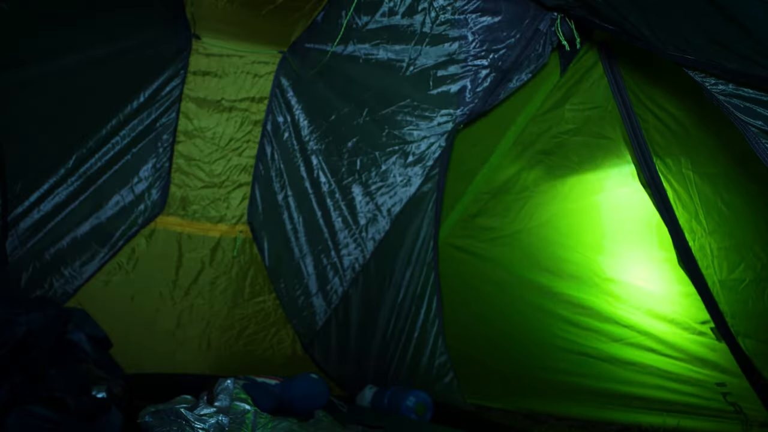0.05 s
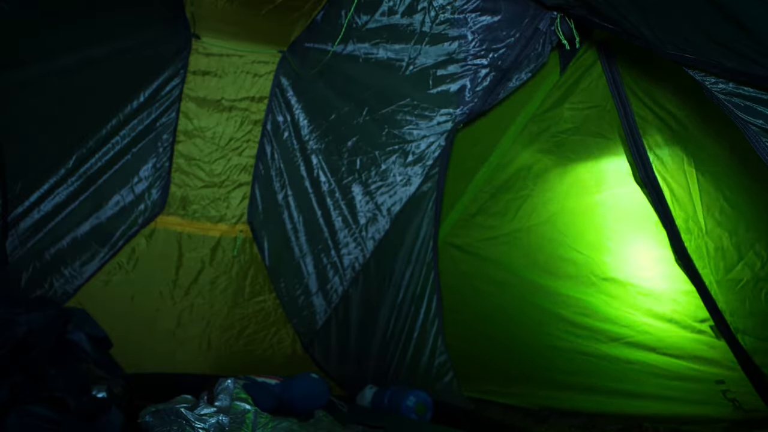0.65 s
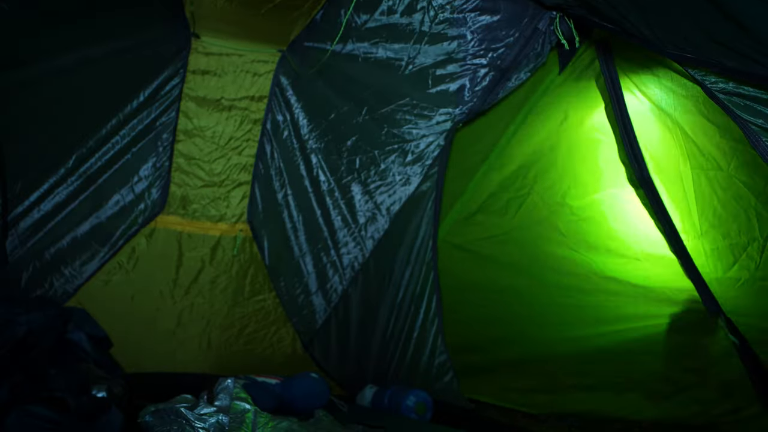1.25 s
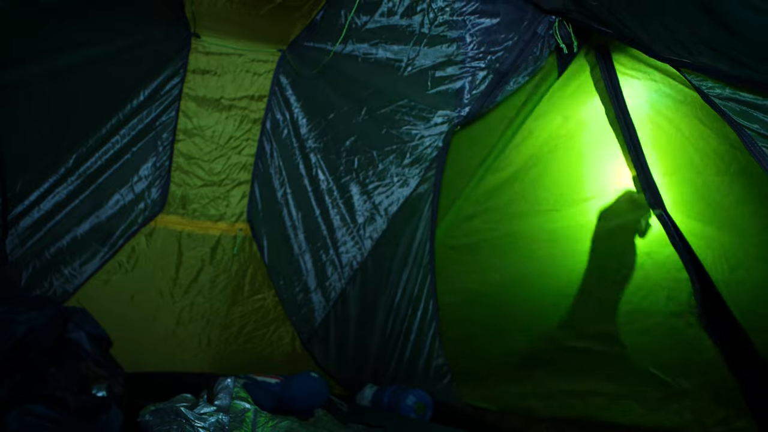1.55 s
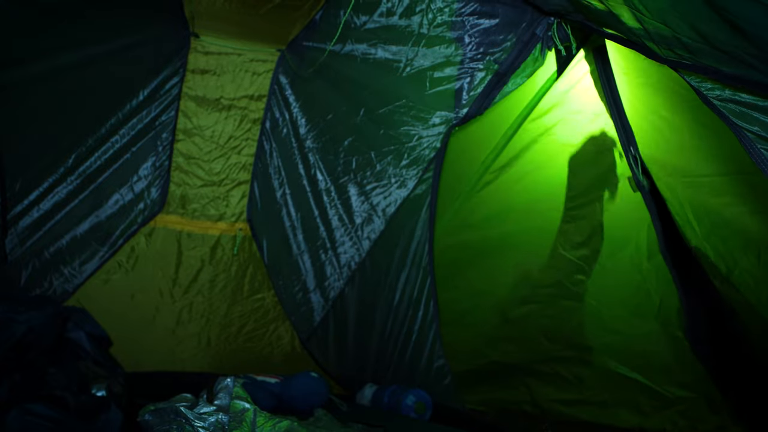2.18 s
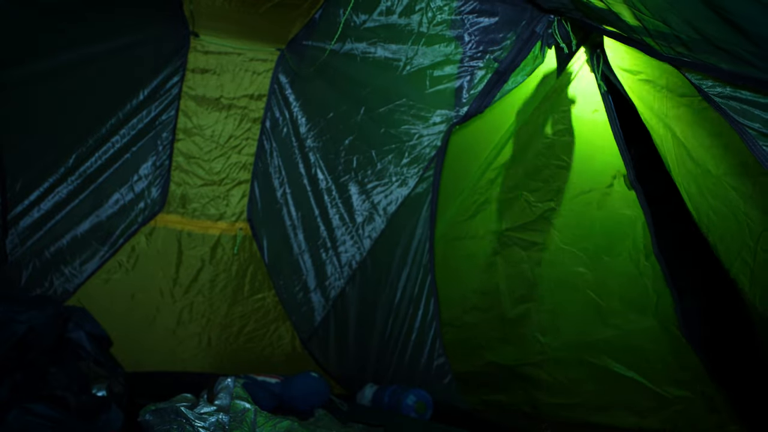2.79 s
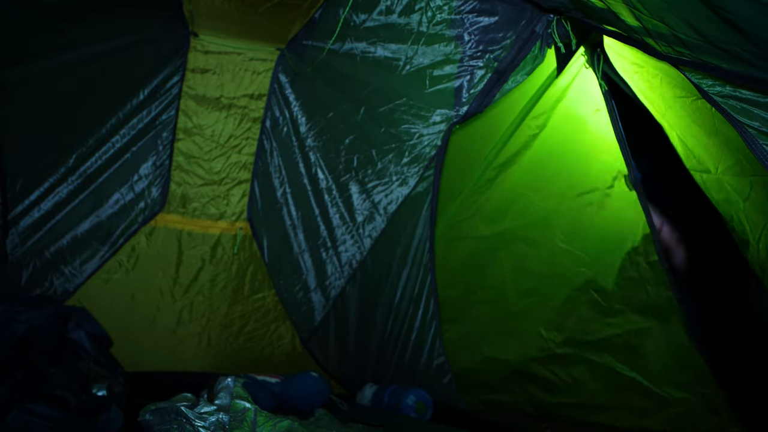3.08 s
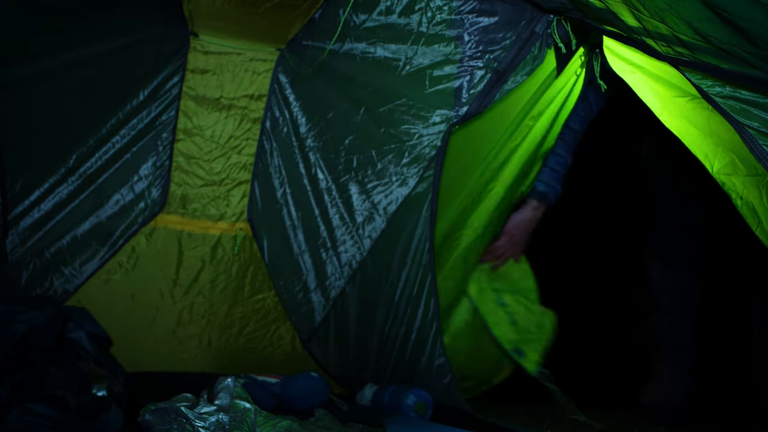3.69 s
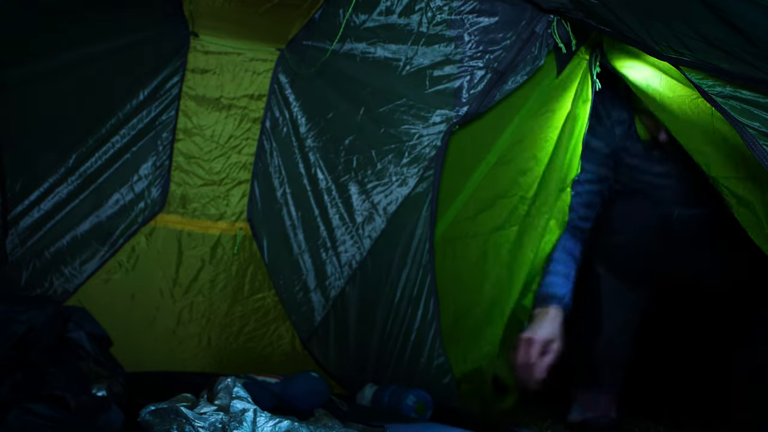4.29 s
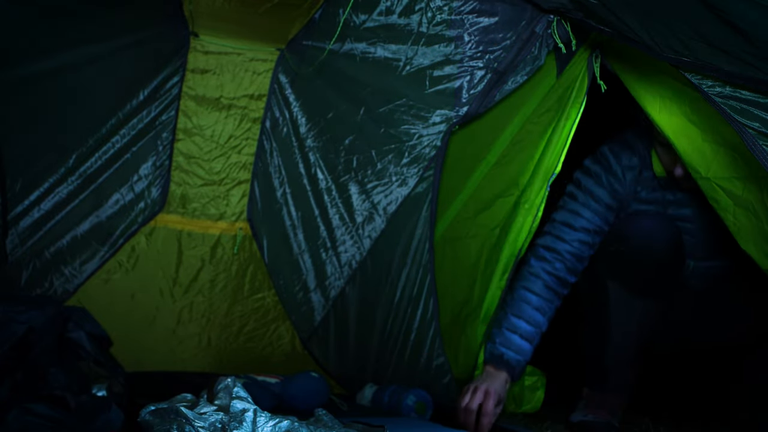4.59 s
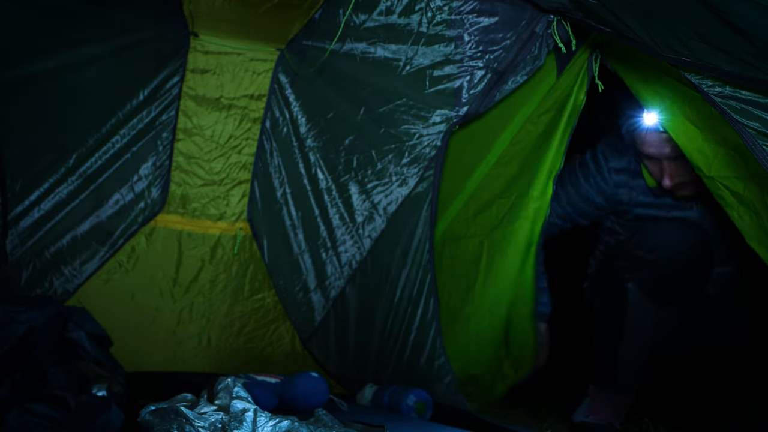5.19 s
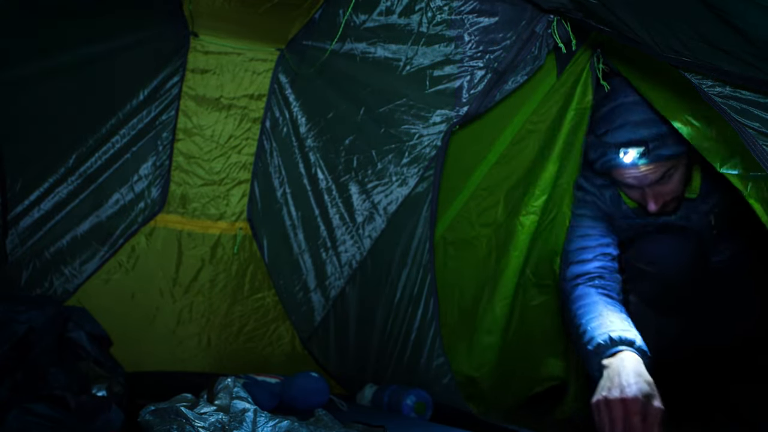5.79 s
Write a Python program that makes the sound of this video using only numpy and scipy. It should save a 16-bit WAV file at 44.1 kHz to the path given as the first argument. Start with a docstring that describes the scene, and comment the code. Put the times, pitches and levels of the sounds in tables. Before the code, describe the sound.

Faint nylon rustling over the low hush of a still night, heard from inside a small tent with the door slightly to the right. At about 0.7 seconds two soft thuds tug the door, and the zipper starts: a rasp with a hum from the taut fabric, growing faster and louder before ending in a sharp fabric snap around 1.6 seconds. After a brief rustle and tiny squeak, a shorter, brighter pull runs from 2.1 to 2.7 seconds, with several crisp snaps. The walls billow in soft, low puffs. From about 2.7 seconds the flap is pushed aside, and nylon swishes and crinkles in uneven strokes with small snapping folds. A person in a padded jacket crawls in, the rustling turning brighter and hissier from around 5 seconds, with one more soft thud and faint fabric squeaks, continuing until about 6 seconds.

```python
"""Faint nylon rustling on a still night, then a small tent's door unzips in two pulls; someone in a
padded jacket pushes the flap aside and crawls in. The zip's teeth drive the taut door like a drumskin,
louder as the slider speeds up. Arm strokes make the cloth swish and crinkle, folds snap, the weave
squeaks and the walls billow. Heard in stereo from inside the tent, a little left of the door."""
import sys
import numpy as np
from scipy import signal
from scipy.fft import rfft, irfft
from scipy.io import wavfile
from scipy.ndimage import uniform_filter1d, map_coordinates

SR = 44100
rng = np.random.default_rng(int(sys.argv[2]) if len(sys.argv) > 2 else 0)


def digitize_waveform(pressure):
    """Quantize a signal to 16-bit integers and store it at the path in sys.argv[1].

    Rows of a 2-D input are taken as channels; values are limited to [-1, 1].
    """
    field = np.atleast_2d(pressure).T
    bounded = np.clip(field, -1, 1)
    quanta = np.round(bounded * 32767).astype(np.int16)
    wavfile.write(sys.argv[1], SR, quanta)


N = 257984
TIME = np.arange(N) / SR
BIN_HZ = np.arange(N // 2 + 1) * SR / N


def undb(db):
    """Decibels to gain."""
    return np.exp(np.asarray(db) * (np.log(10) / 20))


def unit(x):
    """Scale to rms 1."""
    return x / np.sqrt(np.mean(x ** 2) + 1e-18)


def gains(points):
    """Gain per FFT bin from (f/Hz, level/dB) points joined on a log axis."""
    hz, db = np.transpose(points)
    return undb(np.interp(np.log(np.maximum(BIN_HZ, 1)), np.log(hz), db))


def colour(x, points):
    """Filter by a (f/Hz, level/dB) spectrum."""
    return irfft(rfft(x) * gains(points), N)


def band(x, low_hz, high_hz, order=4):
    """Butterworth band-pass."""
    return signal.sosfilt(signal.butter(order, [low_hz, high_hz], "band", fs=SR, output="sos"), x)


def above(x, hz):
    """Zero-phase high-pass."""
    return signal.sosfiltfilt(signal.butter(2, hz, "high", fs=SR, output="sos"), x)


def curves(rows):
    """Columns after t/s, interpolated per sample."""
    times_s, *columns = np.transpose(rows)
    return [np.interp(TIME, times_s, column) for column in columns]


def walk(rate_hz):
    """Random curve of rms 1, about rate_hz new values a second."""
    step = max(int(SR / rate_hz), 1)
    return unit(uniform_filter1d(np.repeat(rng.standard_normal(N // step + 1), step), step)[:N])


def crackle(rate_hz, spread_db, grain_s):
    """Tiny creases give way: many faint bursts, a few strong ones. Mid and side."""
    size = undb(spread_db * np.minimum(rng.standard_exponential(N), 4))
    bursts = (rng.random(N) < rate_hz / SR) * size ** 2
    energy = signal.lfilter([1], [1, -np.exp(-2 / (grain_s * SR))], bursts + 1e-18)
    return unit(np.sqrt(energy) * rng.standard_normal((2, N)))


def movement(peak_s, length_s, slacken_db=5.5, release_s=0.035):
    """A movement builds up (a long one more slowly), slackens while it lasts and dies away."""
    attack_s = 0.034 + 0.61 * length_s
    span = slice(*np.searchsorted(TIME, [peak_s - attack_s, peak_s + length_s + 10 * release_s]))
    t = TIME[span] - peak_s
    attack = np.clip(t / attack_s + 1, 0, 1) ** 2
    hold = undb(-slacken_db * np.clip(t / length_s, 0, 1))
    strength = np.zeros(N)
    strength[span] = attack * hold * np.exp(-np.maximum(t - length_s, 0) / release_s)
    return strength


# Night air spectrum: f/Hz, level/dB
AIR_SPECTRUM = [(15, -28), (25, 1), (1280, -17), (1760, -18.5), (6370, -33.5), (15000, -59.5)]
def night_air(level_db=-53):
    """Still air: a steady, dark hush."""
    return undb(level_db) * unit(colour(rng.standard_normal((2, N)), AIR_SPECTRUM))


# Billowing wall spectrum: f/Hz, level/dB
WALL_SPECTRUM = [(15, -24), (30, -7.5), (50, -2.5), (100, -0.5), (170, -2.5), (300, -12.5), (600, -23),
                 (2000, -70)]
# Heavier pushes: peak t/s, length/s, level/dB
WALL_PUSHES = [(0.777, 0.076, -37), (1.046, 0.35, -35.5), (1.355, 0.54, -33.5), (2.172, 0.054, -32.5),
               (2.28, 0.27, -42), (2.614, 0.061, -35), (4.106, 0.12, -41.5), (5.237, 0.051, -37)]
def billow(rub_power, sway_db=-57.5, follow_db=-15, gain_db=0.74):
    """Slack panels flop in soft, low puffs with every push and stroke."""
    power = undb(sway_db) ** 2 + undb(follow_db) ** 2 * rub_power
    power += sum((undb(db) * movement(peak_s, length_s)) ** 2 for peak_s, length_s, db in WALL_PUSHES)
    puffs = colour(crackle(rate_hz=450, spread_db=2.4, grain_s=0.006), WALL_SPECTRUM)
    return unit(puffs) * np.sqrt(power) * undb(gain_db)


# Tugs on the door: t/s, level/dB
DOOR_TUGS = [(0.704, -19), (0.734, -16), (5.42, -18.5)]
def door_thuds(hz=115, decay_s=0.0014):
    """The hand takes up the door's slack: one short thud per tug."""
    out = np.zeros(N)
    for start_s, db in DOOR_TUGS:
        t = np.maximum(TIME - start_s, 0)
        out += undb(db) * np.sin(2 * np.pi * hz * t) * np.exp(-t / decay_s)
    return out


# Ribbed weave sliding: t/s, length/s, first f/Hz, last f/Hz, level/dB
WEAVE_SQUEAKS = [(1.936, 0.031, 4500, 4230, -50), (1.982, 0.033, 1926, 1670, -37.5),
                 (2.702, 0.252, 1605, 1569, -48), (5.502, 0.022, 3860, 3810, -35.5),
                 (5.605, 0.047, 3340, 3260, -34.5)]
def squeaks(jitter=0.025):
    """Threads trip over each other and sing at a rough, slightly falling pitch."""
    out = np.zeros((2, N))
    for start_s, length_s, first_hz, last_hz, db in WEAVE_SQUEAKS:
        progress = np.clip((TIME - start_s) / length_s, 0, 1)
        for channel in out:
            hz = (first_hz + (last_hz - first_hz) * progress) * (1 + jitter * walk(1000))
            envelope = np.sin(np.pi * progress) * undb(db + 2 * walk(160))
            channel += envelope * np.sin(2 * np.pi * np.cumsum(hz) / SR)
    return out


# Nylon-on-nylon strokes: peak t/s, length/s, level/dB, brightness/dB
ARM_STROKES = [(0.0, 0.077, -49.5, -4.5), (0.193, 0.056, -48, -3), (1.199, 0.014, -33.5, -2.5),
               (1.683, 0.22, -47, -1.5), (1.967, 0.13, -45.5, -0.5), (2.171, 0.016, -25, -2.5),
               (2.575, 0.062, -36.5, 0.5), (2.797, 0.083, -44.5, -5.5), (2.875, 0.013, -43, 2),
               (3.086, 0.45, -51, -7.5), (3.235, 0.096, -37, -2.5), (3.407, 0.16, -40.5, -2),
               (3.517, 0.072, -36.5, 2), (3.632, 0.058, -38.5, -2), (3.714, 0.063, -36, 2.5),
               (3.82, 0.22, -41.5, -1), (4.119, 0.15, -40, -2.5), (4.262, 0.45, -39.5, 3),
               (4.765, 0.19, -41.5, 1.5), (5.014, 0.5, -47.5, -0.5), (5.161, 0.12, -47.5, 28),
               (5.214, 0.069, -31, 4.5), (5.445, 0.038, -41, -2.5), (5.504, 0.015, -39, 10),
               (5.62, 0.055, -35, 6), (5.662, 0.32, -38.5, 7.5)]
def arm_strokes(stir_db=-68, stir_bright_db=-13, dulling_db=7):
    """Rubbing power and power-weighted brightness/dB over a faint stir; slowing strokes turn duller."""
    power = undb(stir_db) ** 2
    weighted_db = power * stir_bright_db
    for peak_s, length_s, db, bright_db in ARM_STROKES:
        strength = movement(peak_s, length_s)
        stroke_power = (undb(db) * strength) ** 2
        power += stroke_power
        weighted_db += stroke_power * (bright_db - dulling_db * (1 - strength))
    return power, weighted_db / power


# Rubbed nylon spectrum: f/Hz, level/dB
NYLON_SPECTRUM = [(88, -41), (150, -2.5), (343, -4.5), (780, -2.5), (1180, -9), (1600, -2), (2000, -5.5),
                  (2600, -7), (3400, -9.5), (4210, -13.5), (5200, -16.5), (10200, -34), (12600, -33),
                  (15000, -52)]
def sliding_nylon(crinkle_db, patchy_db):
    """Sliding cloth swishes while its creases crinkle; rms 1 in the middle band."""
    swish = rng.standard_normal((2, N)) * undb(patchy_db * walk(45))
    crinkle = crackle(rate_hz=200, spread_db=3.1, grain_s=0.0024)
    cloth = colour(swish + undb(crinkle_db) * crinkle, NYLON_SPECTRUM)
    return cloth / np.std(band(cloth[0], 500, 4000))


# Hollow colour of the rustle: t/s, first mid-channel peak f/Hz, strength/0-1
HOLLOW_TREBLE = [(2.7, 1485, 0.13), (3.6, 1764, 0.08), (5.25, 1630, 0.2), (5.65, 1750, 0.24)]
def hollow_comb(cloth, side_delay_ratio=1.53):
    """A short delay combs the treble, differently in mid and side, so the rustle sounds hollow."""
    hz, strength = curves(HOLLOW_TREBLE)
    treble = above(cloth, 1250)
    late = np.array([map_coordinates(channel, [np.arange(N) - ratio * SR / hz])
                     for channel, ratio in zip(treble, (1, side_delay_ratio))])
    return cloth - treble + (treble + strength * late) / np.hypot(1, strength)


def rustle(rub_power, bright_db, gain_db=0.04):
    """Door folds crinkle low, the jacket's shell hisses high; faster sliding tilts towards hiss."""
    folds = sliding_nylon(crinkle_db=-0.5, patchy_db=2.2)
    shell = sliding_nylon(crinkle_db=-5, patchy_db=2)
    low = (folds - above(folds, 1100)) * undb(-0.34 * bright_db)
    middle = above(folds, 1100) - above(folds, 2900)
    treble = (above(shell, 2350) - above(shell, 5000)) * undb(0.57 * bright_db)
    hiss = above(shell, 5000) * undb(bright_db - 2)
    return np.sqrt(rub_power) * undb(gain_db) * hollow_comb(low + middle + treble + hiss)


# Taut cloth modes: f/Hz, level/dB, t60/s
TAUT_MODES = [(125, -18, 0.09), (294, 9.5, 0.0073), (705, 3.5, 0.019), (1068, 3.5, 0.013),
              (1835, 8.5, 0.01), (2363, -1.5, 0.02), (3540, -5, 0.014)]
# Slider catches and snapping folds: t/s, level/dB, centre f/Hz
FOLD_SNAPS = [(0.371, -37, 590), (0.751, -31, 760), (0.947, -27, 600), (1.044, -23.5, 590),
              (1.434, -23, 400), (1.643, -7.5, 660), (1.761, -29, 689), (1.817, -24, 626),
              (1.867, -28, 600), (2.156, -13.5, 1890), (2.166, -15, 593), (2.175, -13, 1710),
              (2.191, -16, 2140), (2.498, -10.5, 1770), (2.697, -28.5, 1160), (2.863, -28, 1530),
              (3.276, -17.5, 1870), (3.361, -22.5, 1830), (3.389, -29.5, 1390), (3.411, -25.5, 1580),
              (3.438, -26.5, 1740), (3.461, -31, 1580), (3.769, -26, 1500), (4.017, -25, 1940),
              (4.74, -22, 2100), (4.745, -19, 2100), (4.771, -27, 2800), (5.205, -21, 1450)]
def snaps(full_ring_db=-13, crack_s=0.001, crumple_s=0.012, rise_s=0.00061, gain_db=1, side_db=-3):
    """A fold cracks, rings and crumples. Tight folds favour high modes; light snaps barely ring."""
    out, t = np.zeros((2, N)), TIME[:SR // 16]
    hz, mode_db, t60_s = np.transpose(TAUT_MODES)[:, :, None]
    for start_s, db, centre_hz in FOLD_SNAPS:
        detune = 1 + 0.07 * rng.standard_normal((2, len(hz), 1))
        favour_db = np.maximum(-6 * np.log2(hz / centre_hz) ** 2, -6)
        weight = undb(mode_db + favour_db) * rng.choice([-1, 1], detune.shape)
        ring = np.sum(weight * np.sin(2 * np.pi * hz * detune * t) * undb(-60 * t / t60_s), axis=1)
        ring_db = -0.65 * np.clip(full_ring_db - db, 0, 15)
        noise = band(rng.standard_normal((2, len(t))), centre_hz / 4, 2000 + 0.7 * centre_hz, order=3)
        crack = noise * (np.exp(-t / crack_s) + undb(-12) * np.exp(-t / crumple_s))
        snap = undb(ring_db) * ring / np.abs(ring).max() + undb(-5) * crack
        snap *= 1 - np.exp(-t / rise_s)
        snap /= np.abs(snap).max(axis=1, keepdims=True)
        start = int(start_s * SR)
        out[:, start:start + len(t)] += snap * undb(db + gain_db)
    return out * undb([[0], [side_db]])


# Door resonances: f/Hz, half-width/Hz, boost/dB
DOOR_MODES = [(258, 137, 6.5), (461, 17.6, 9.5), (555, 12, 4), (708.6, 8.7, 9)]
def door_hum(teeth, tooth_hz, rough, slowness, halving_octaves_per_s=28):
    """Each tooth tugs the door: a hum at the tooth rate, louder on a resonance."""
    octave = 0.2 * slowness * np.cos(4 * np.pi * teeth + walk(40))  # slow teeth tug one by one
    tug_strength = 1 + (0.1 + 0.6 * rough) * walk(600)
    hum = np.sqrt(2) * (np.sin(2 * np.pi * teeth) + octave) * tug_strength
    boost_db = sum(db / (1 + ((tooth_hz - hz) / width_hz) ** 2) for hz, width_hz, db in DOOR_MODES)
    # a sudden change of speed leaves the door no time to ring
    octaves_per_s = uniform_filter1d(np.abs(np.gradient(np.log2(tooth_hz))) * SR, SR // 50)
    lurch = octaves_per_s / halving_octaves_per_s
    return hum * undb(boost_db + 1.9 * walk(70)) / (1 + lurch ** 2)


def tooth_ticks(teeth, spread_db):
    """One sharp tick per tooth, each of its own strength; overtones waver as the slider travels."""
    strength = undb(spread_db * rng.standard_normal(N)[np.round(teeth).astype(int)])
    ticks = np.zeros(N)
    for harmonic in range(2, 16):
        overtone = np.cos(2 * np.pi * (harmonic * teeth + 0.15 * walk(30)))
        ticks += strength * min(harmonic / 3.3, 1) * overtone * undb(2.6 * walk(30))
    return ticks - above(ticks, 5000)


# Spectrum of the slider on the teeth: f/Hz, level/dB
SLIDER_SPECTRUM = [(200, -30), (550, -1), (780, 6), (1080, 0), (1380, 4), (1850, 0), (2420, -4.5),
                   (2820, -5), (3150, -10.5), (3500, -10), (4600, -15.5), (5800, -17), (15000, -53)]
def through_slider(drive, progress, gate, ring_hz, ring_db):
    """The slider colours the rasp; higher up, the tauter tape rings more. Output is levelled."""
    rasp = colour(drive, SLIDER_SPECTRUM)
    ring = signal.lfilter(*signal.iirpeak(ring_hz, 3, SR), rasp)
    rasp += undb(ring_db) * progress ** 2 * ring
    power = band(np.atleast_2d(rasp)[0], 1100, 4500) ** 2
    return rasp / np.sqrt(uniform_filter1d(power, SR // 8) + np.mean(power[gate > 0]) / 10)


def zip_pull(run, hum_db, stiffen_db, rasp_db, tighten_db, teeth_db, ring_hz, ring_db):
    """Teeth hum through the door and tick and scrape in the slider, all louder with speed."""
    easy_pull_hz, hum_db_per_octave, rasp_db_per_octave = 400, 5, 7.5
    slack_db, taut_s, tauten_s = -4, 0.99, 0.023
    fade_s, blunting_db, scrape_db = 0.02, 7, -3.5
    tooth_hz, rough = curves(run)
    start_s, end_s = run[0][0], run[-1][0]
    gate = np.interp(TIME, [start_s - fade_s, start_s, end_s, end_s + fade_s], [0, 1, 1, 0])
    progress = np.clip((TIME - start_s) / (end_s - start_s), 0, 1)
    octaves = np.log2(tooth_hz / easy_pull_hz)

    # a rough slider jerks, the more so when slow
    slowness = np.minimum(300 / tooth_hz, 1.2) ** 3
    jerk = 0.18 * rough * (0.3 + slowness) * walk(220) + 0.008 * walk(90) + 0.05 * slowness * walk(45)
    teeth = np.cumsum(tooth_hz * (1 + jerk)) / SR  # count of teeth passed
    hum = door_hum(teeth, tooth_hz, rough, slowness) * [[1], [0]]  # mid only
    hum *= undb(hum_db + hum_db_per_octave * octaves + stiffen_db * progress ** 4)

    ticks = tooth_ticks(teeth + 0.05 * rough * walk(400), spread_db=1.5 + 4 * rough)
    scrape = np.exp(-1.3 * (teeth % 1)) * crackle(rate_hz=2400, spread_db=3.5, grain_s=0.011)
    ticks, scrape = (through_slider(x, progress, gate, ring_hz, ring_db) for x in (ticks, scrape))
    rasp = undb(teeth_db - blunting_db * rough) * ticks * [[1], [0.5]]
    rasp += undb(scrape_db) * scrape * undb([[0], [-2.5]])
    rasp *= undb(rasp_db + rasp_db_per_octave * octaves + tighten_db * progress)

    slack = np.clip((taut_s - TIME) / tauten_s + 0.5, 0, 1)  # quieter until the door comes taut
    return gate * undb(slack_db * slack) * (hum + rasp)


# Slider travel, one table per pull: t/s, tooth rate/Hz, roughness/0-1
FIRST_PULL = [(0.755, 274.2, .3), (0.834, 180.1, 0.37), (0.887, 192.8, 0.32), (0.956, 285.2, .4),
              (1.07, 340.5, 0.41), (1.165, 262.3, 0.6), (1.28, 271.7, 0.54), (1.343, 299.7, 0.45),
              (1.393, 640, 0.6), (1.448, 689.3, 0.42), (1.488, 716.5, 0.15), (1.54, 560, 0.55),
              (1.58, 580.4, 0.11), (1.653, 260.2, 0.3), (1.68, 153.7, 0.76)]
SECOND_PULL = [(2.125, 206, 0.67), (2.171, 539.2, 0.62), (2.205, 377.4, 0.57), (2.29, 462.6, 0.5),
               (2.352, 544.8, 0.37), (2.39, 467.4, 0.13), (2.428, 455.3, 0.1), (2.478, 352.4, 0.096),
               (2.523, 245.3, 0.89), (2.65, 174.1, 0.94)]
def zipper():
    """A long pull that speeds up, then a short, brighter one ending at the door's stiff, ringing top."""
    first = zip_pull(FIRST_PULL, hum_db=-33, stiffen_db=1.5, rasp_db=-38.5, tighten_db=0,
                     teeth_db=1.5, ring_hz=3170, ring_db=-4.5)
    second = zip_pull(SECOND_PULL, hum_db=-39, stiffen_db=-14, rasp_db=-39.5, tighten_db=12.5,
                      teeth_db=2, ring_hz=2280, ring_db=12)
    return first + second


# Bias from the door lying to the right: f/Hz, left minus right level/dB
DOOR_BALANCE = [(100, 0), (250, -1.8), (600, -5.8), (1300, -3.8), (2400, -3.5), (4400, -6), (8000, 0)]
# Microphone width: f/Hz, side gain/dB
SIDE_SPECTRUM = [(50, -33), (600, -10.5), (1400, -10), (2400, 0), (4400, 4), (8000, 9.5)]
def stereo_microphone(mid, side):
    """Mid and side to left and right: wide treble, the left weaker and slightly later."""
    side = colour(side, SIDE_SPECTRUM)
    lag_rad = 0.5 * np.minimum(BIN_HZ / 1400, 1)
    left_ratio = gains(DOOR_BALANCE) * np.exp(-1j * lag_rad)
    right_spectrum = rfft(mid) * 2 / (1 + left_ratio)
    return np.array([irfft(right_spectrum * left_ratio, N) + side, irfft(right_spectrum, N) - side])


def scene():
    """Zip, cloth and night air, summed as mid and side and heard inside the tent."""
    air = night_air()
    rub_power, bright_db = arm_strokes()
    door = zipper() + door_thuds()
    cloth = rustle(rub_power, bright_db) + billow(rub_power) + snaps() + squeaks()
    return stereo_microphone(*(air + cloth + door))


def record(dry):
    """Steep low-pass on the top treble."""
    cutoff_hz = 15600
    return signal.sosfilt(signal.ellip(10, 0.2, 70, cutoff_hz, fs=SR, output="sos"), dry)


dry = scene()
out = record(dry)
digitize_waveform(out)
```